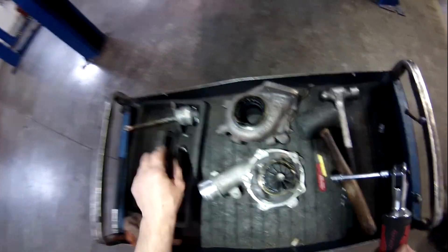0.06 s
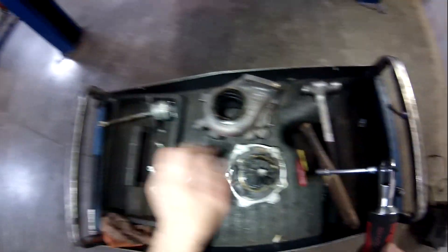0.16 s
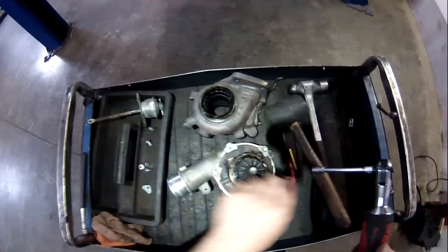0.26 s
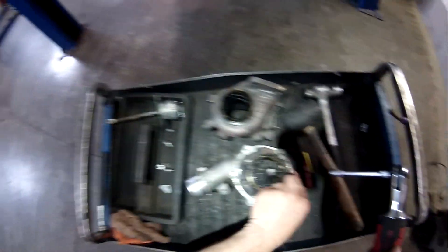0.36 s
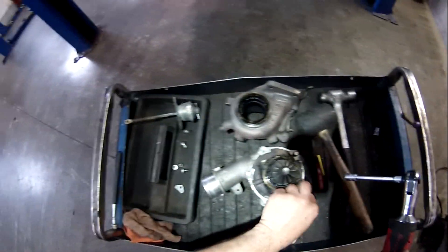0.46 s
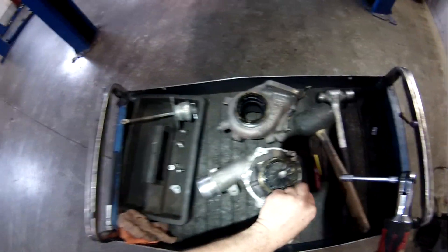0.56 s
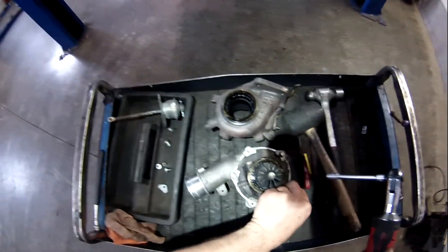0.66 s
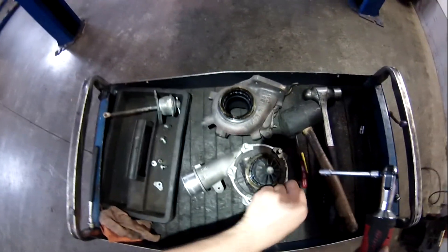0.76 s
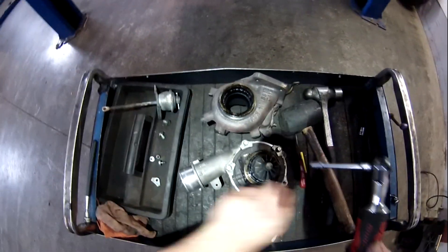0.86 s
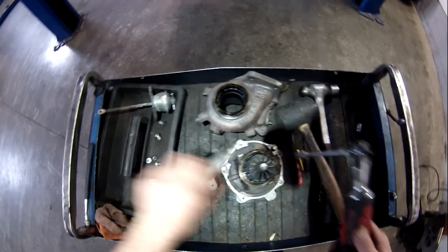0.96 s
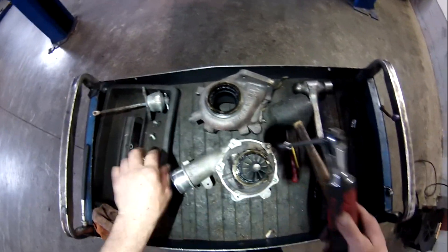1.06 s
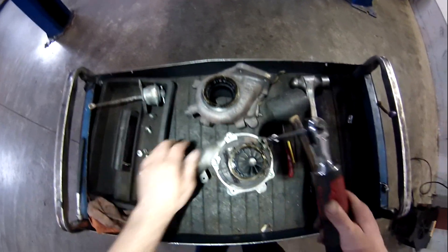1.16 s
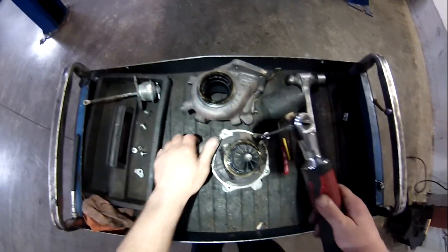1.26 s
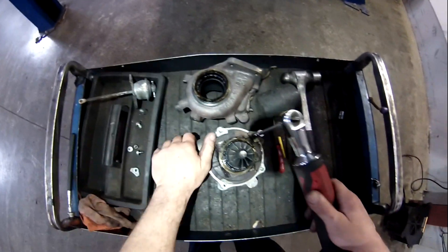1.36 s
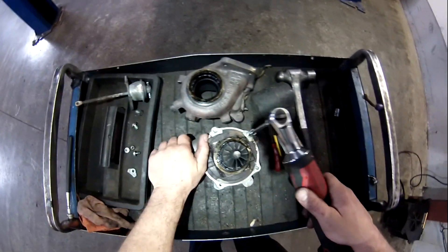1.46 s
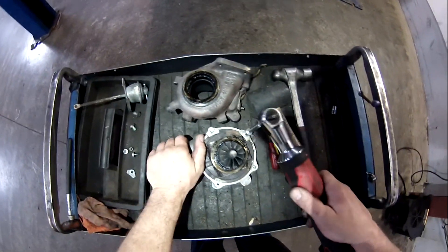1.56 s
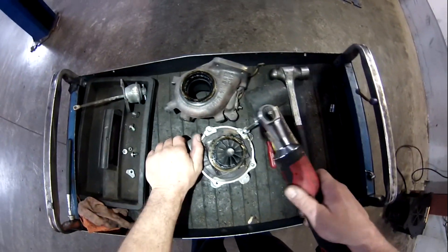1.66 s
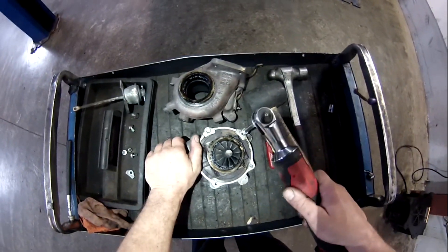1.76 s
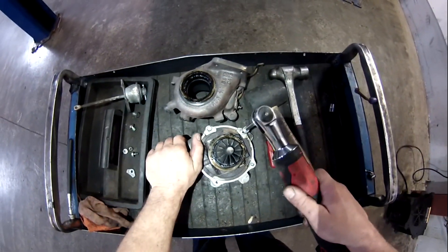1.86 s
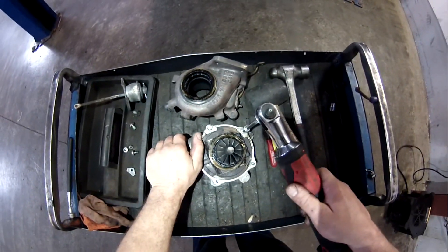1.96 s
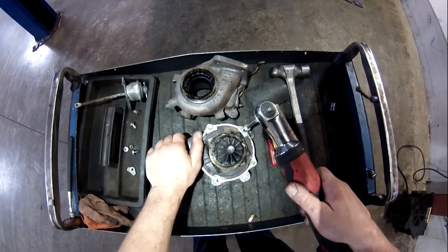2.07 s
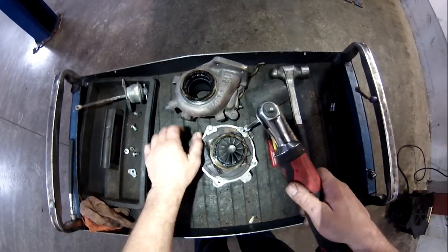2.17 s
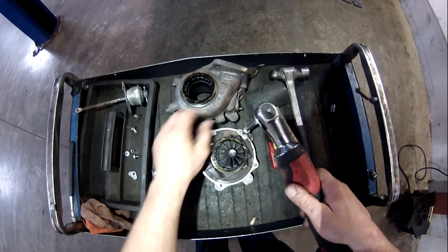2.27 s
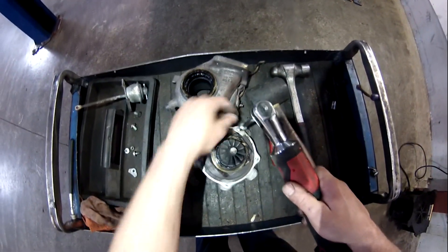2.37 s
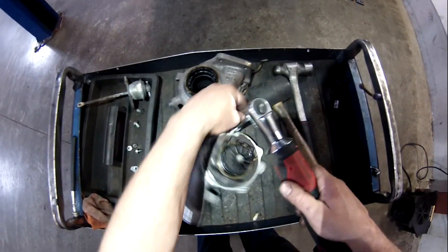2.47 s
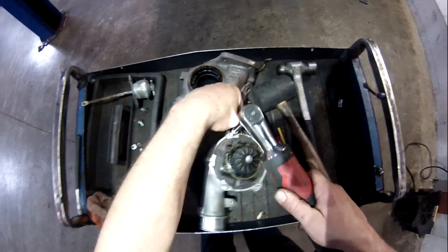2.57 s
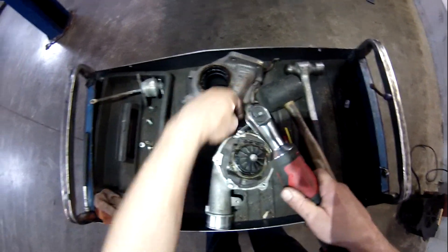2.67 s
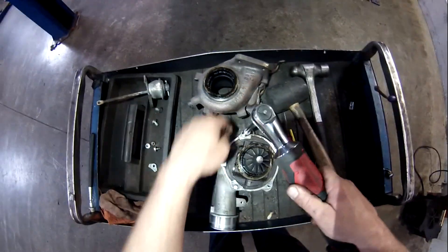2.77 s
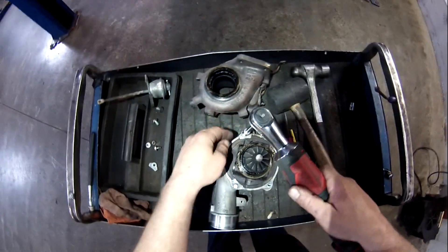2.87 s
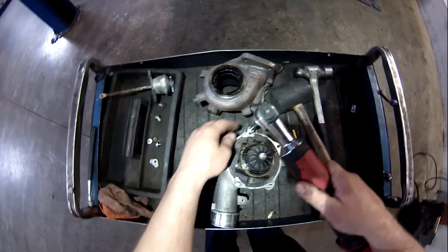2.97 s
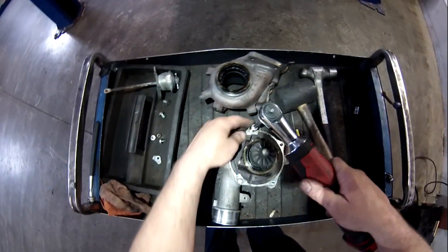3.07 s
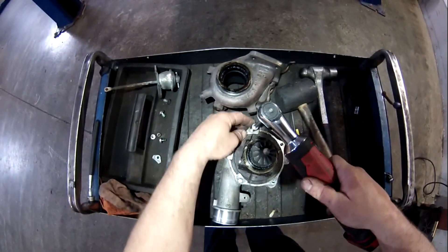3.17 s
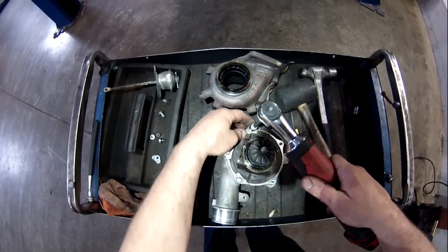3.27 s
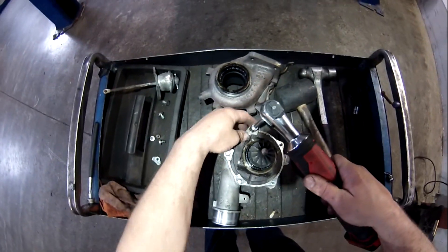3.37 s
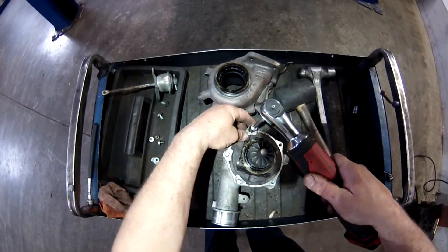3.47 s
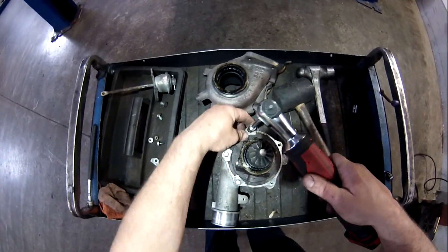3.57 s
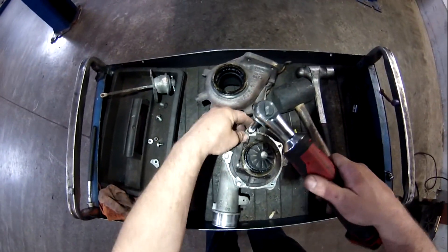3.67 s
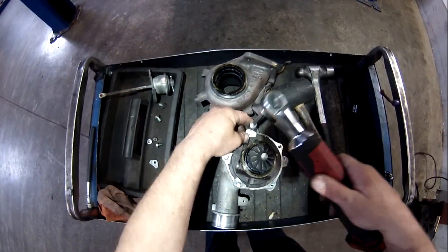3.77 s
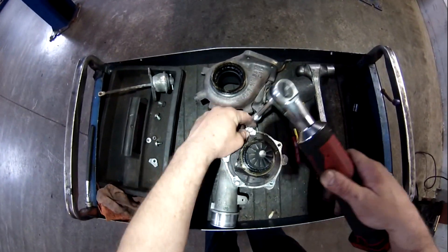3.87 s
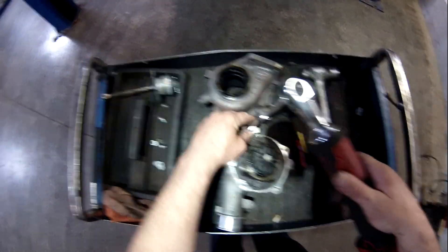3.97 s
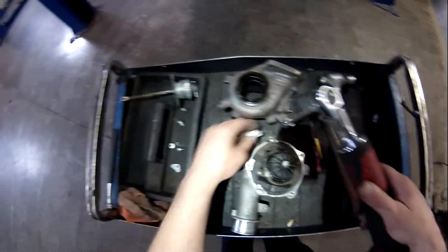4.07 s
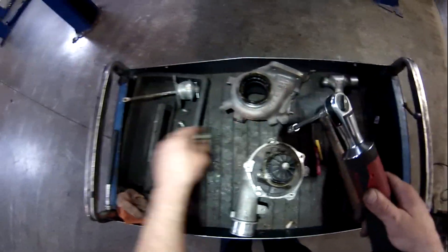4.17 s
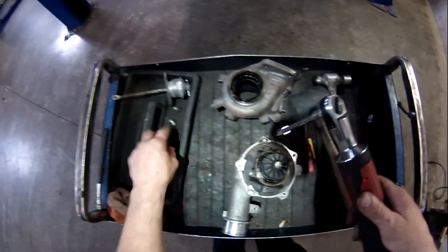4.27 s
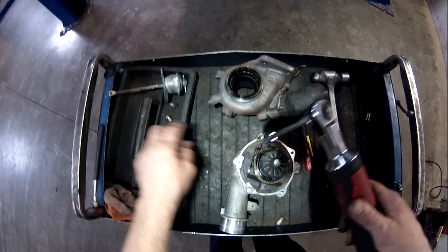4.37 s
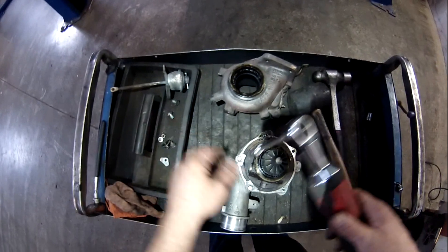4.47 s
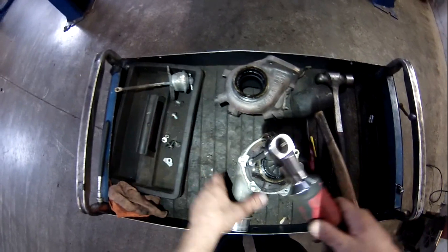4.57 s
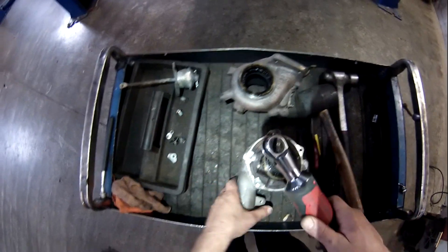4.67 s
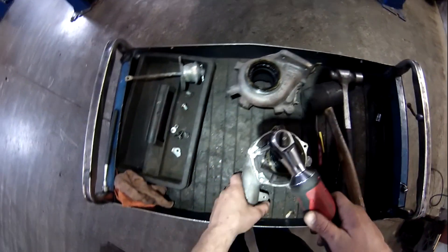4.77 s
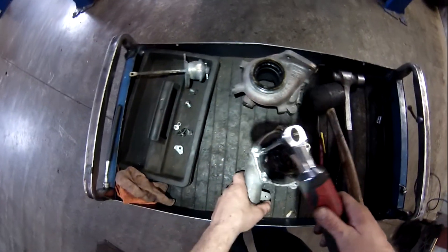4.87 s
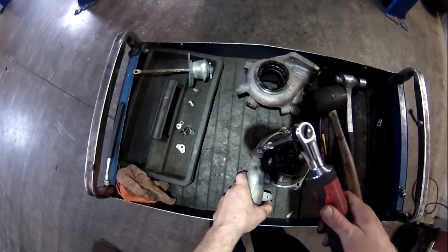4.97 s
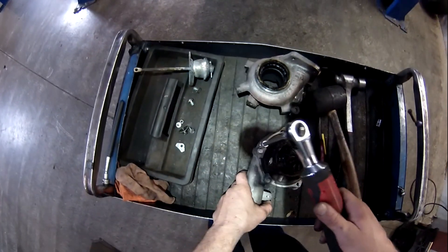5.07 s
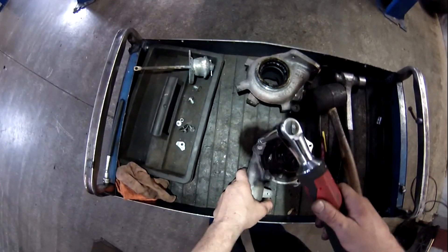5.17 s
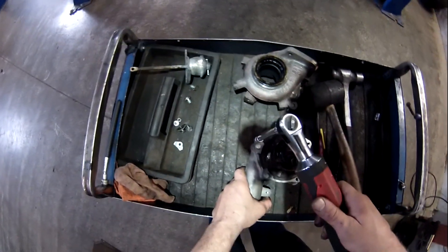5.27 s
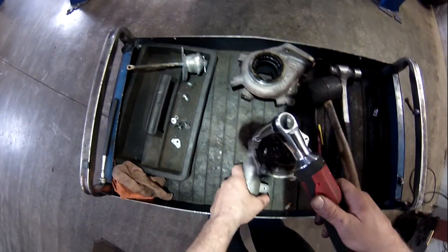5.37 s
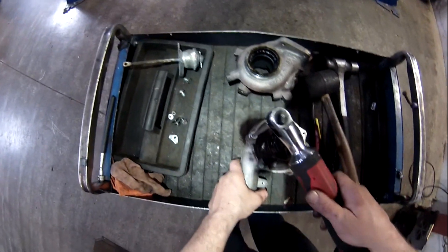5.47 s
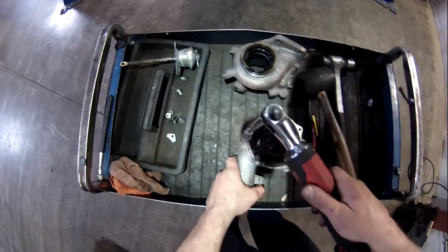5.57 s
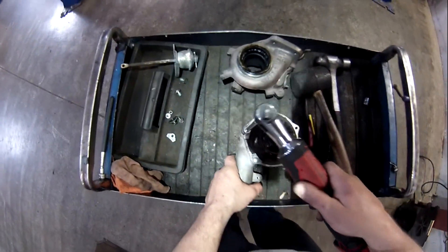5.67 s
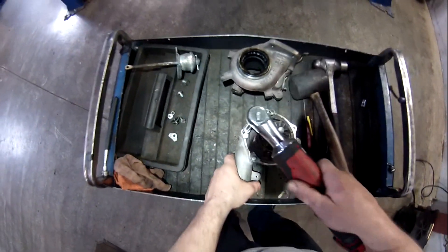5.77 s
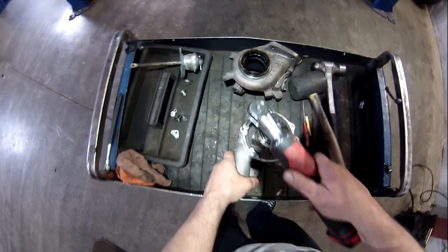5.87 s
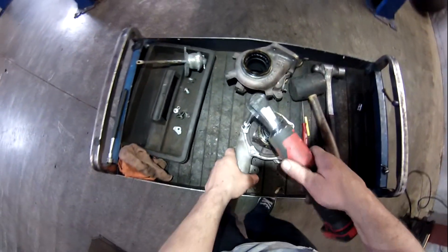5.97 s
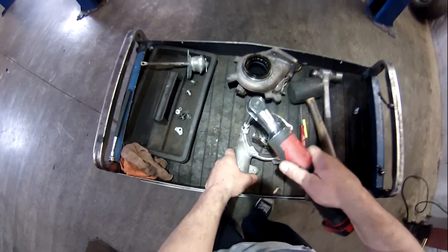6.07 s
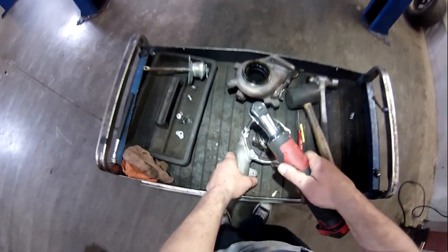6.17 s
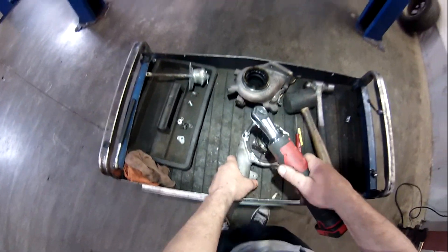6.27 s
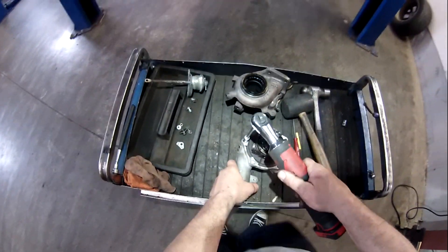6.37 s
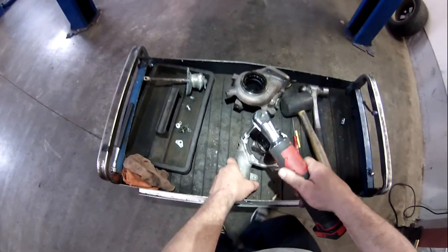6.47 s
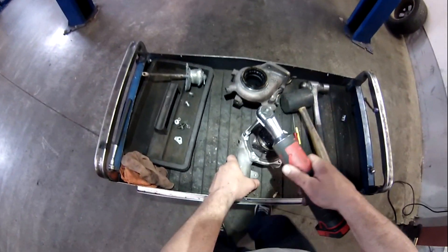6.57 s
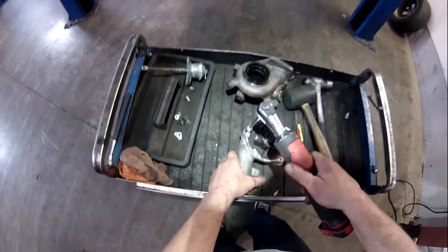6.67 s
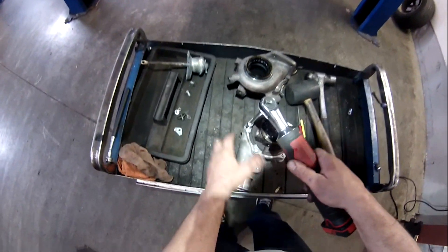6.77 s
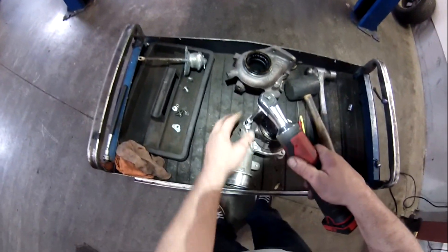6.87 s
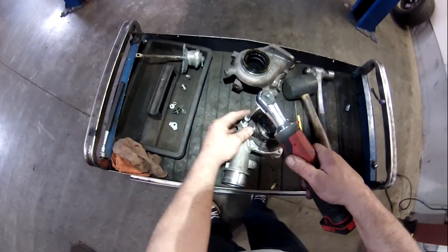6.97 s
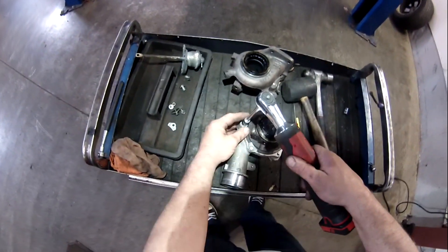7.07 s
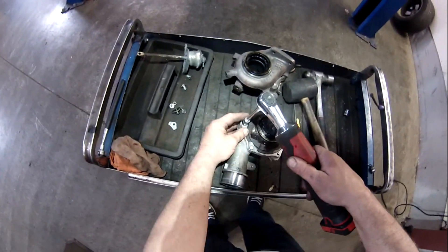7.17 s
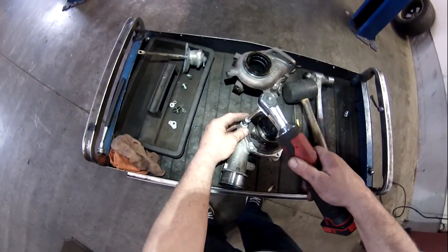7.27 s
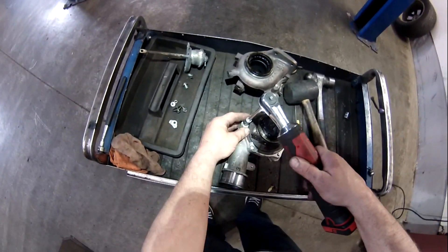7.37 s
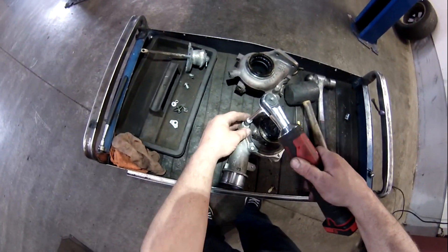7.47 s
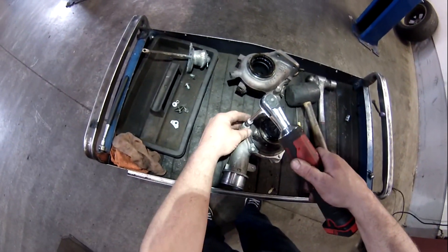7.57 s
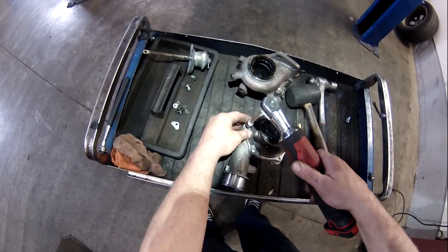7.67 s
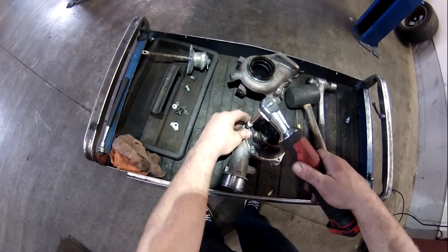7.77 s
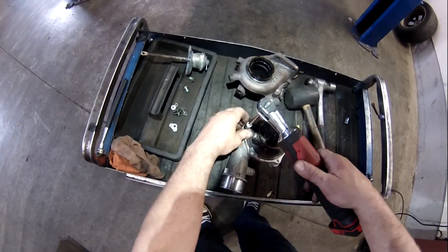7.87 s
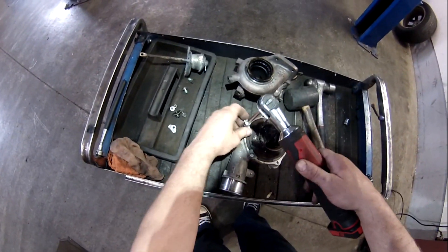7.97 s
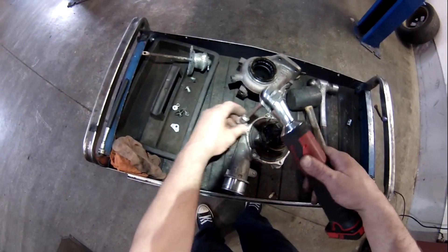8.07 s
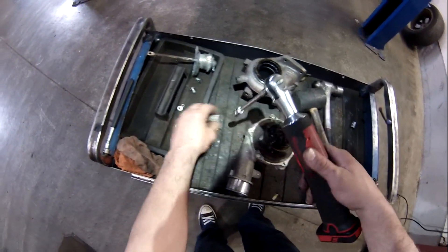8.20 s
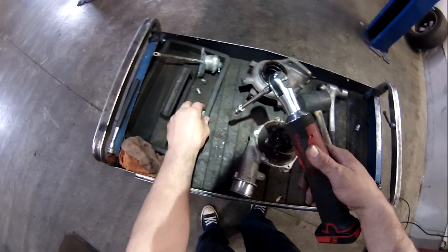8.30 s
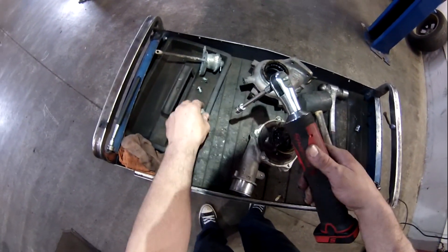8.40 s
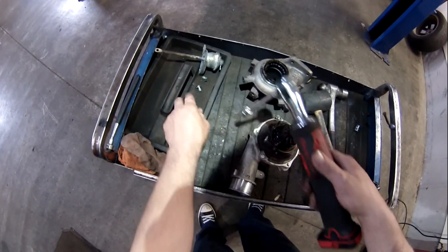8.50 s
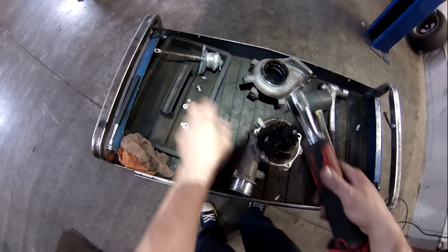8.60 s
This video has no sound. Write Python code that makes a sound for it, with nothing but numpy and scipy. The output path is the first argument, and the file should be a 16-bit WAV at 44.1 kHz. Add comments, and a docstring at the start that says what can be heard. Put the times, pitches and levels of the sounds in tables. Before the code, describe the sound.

In an echoing workshop with steady air noise and faint hum, a bolt smacks into a soft plastic tray and bounces. The housing knocks on the cart, then a cordless ratchet rattles for two seconds, labouring and then running free. More bolts drop, the socket clinks, and a second similar run follows before a faint last drop. A body-worn microphone close by clips on the loudest hits.

```python
"""First a bolt drops and bounces in a plastic tray, over the steady air noise and hum of a workshop.
Then a cordless ratchet spins two bolts out of a turbo housing lying on a plastic cart: on every crank turn
the pawl and yoke clack in the steel head, made of noise bursts, over gear hum made of sine tones.
In between, more bolts drop, the housing knocks on the cart and the socket clinks: noise bursts plus ringing
tones. The room echoes, and a body-worn camera close by overloads on the peaks."""
import sys
import numpy as np
from scipy import signal
from scipy.fft import rfft, irfft
from scipy.io import wavfile
from scipy.ndimage import uniform_filter1d

SR = 44100
rng = np.random.default_rng(int(sys.argv[2]) if len(sys.argv) > 2 else 0)


def bounce(signal):
    """Save signal as a 16-bit WAV file at the path given by the first command-line argument."""
    frames = np.transpose(np.atleast_2d(signal))
    limited = np.clip(frames, -1, 1)
    pcm = np.round(limited * 32767).astype(np.int16)
    wavfile.write(sys.argv[1], SR, pcm)


N = 381024


# trigger pulls: (start [s], trigger eased [s], stop [s], bolt cracks loose [s], spin-up [s],
# slowing after easing [Hz per s], clatter when free [dB], shake when free [dB])
TRIGGER_PULLS = [(1.694, 3.629, 3.735, 1.695, .05, 55, -8, -49.5),
                 (5.972, 7.721, 7.912, 6.089, .075, 114.8, -8.5, -54)]
# how hard the thread grips as the bolt backs out, one curve a pull: (time [s], grip [0-1])
THREAD_GRIP = [
    [(1.7, 0.77), (1.92, .45), (2.35, 0.64), (2.52, .98), (2.95, .8), (3.22, 0.04), (3.6, 0)],
    [(6.1, 0.82), (6.33, 0.98), (6.5, .8), (6.82, 0.79), (6.98, 0.37), (7.35, 0.04), (7.7, 0.07)],
]
# the part of the housing that sings along, one row a pull: (pitch [Hz], width [Hz], level [dB])
HOUSING_NOTES = [(520, 100, -1), (984, 166, -3.5)]


def unscrew_bolts():
    """Each bolt grips in its own way and passes the clatter to another part of the housing."""
    pulls = zip(TRIGGER_PULLS, THREAD_GRIP, HOUSING_NOTES)
    return sum(ratchet(pull, grip, note) for pull, grip, note in pulls)


# contacts within one crank turn: (share of the turn [0-1], level [dB], timing scatter [ms])
CONTACTS = [(.04, -12, .12), (.12, -7, .25), (.2, -10, .3), (.47, -9, .35), (.69, -11, .5), (.82, -16, .5),
            (.94, -9, .4)]


def ratchet(pull, grip_curve, housing_note, wobble=.008, unsteady_db=0.78, spin_up_db=-17, spin_up_s=0.031):
    """One trigger pull: the contacts of each crank turn strike the head while gears hum and the cart shakes."""
    t = np.arange(N) / SR
    start, _, stop, *_ = pull
    running = (t >= start) & (t <= stop)
    rate, clatter_db, shake_db = drive(t, pull, grip_curve)
    hz = (rate * (1 + wobble * walk(30)))[running]
    turns = np.cumsum(hz) / SR
    clacks = np.zeros(N)
    for share, contact_db, scatter_ms in CONTACTS:
        # once in every turn, at the same share of the turn
        times = np.interp(np.arange(share, turns[-1], 1), turns, t[running])
        clacks += undb(contact_db) * contact_train(times, scatter_ms)
    # the motor rustles briefly as it takes up the slack
    rustle_shape = np.interp(t, [start - spin_up_s, start, start + spin_up_s], [0, 1, 0])
    rustle = rustle_shape * rng.standard_normal(N)
    struck = clacks + undb(spin_up_db) * np.std(clacks[running]) * rustle
    clatter = steel_head(struck, housing_note)
    out = clatter / np.std(clatter[running])
    edges = signal.windows.tukey(len(hz), .02)
    add(out, start, edges * gear_tones(turns, hz))
    # the hand never holds the tool quite steady
    out = out * undb(clatter_db + unsteady_db * walk(14))
    add(out, start, edges * cart_shake(turns) * undb(shake_db[running]))
    return out


# crank turns per second when running free, and how many a full grip takes away
FREE_HZ, DRAG_HZ = 87.65, 9.3
KICK_SHARE = .62  # share of its speed at which the motor kicks in
# clatter: growth with speed [dB per octave], growth at full grip [dB], change before the bolt is loose [dB]
SPEED_DB_PER_OCTAVE, GRIP_DB, SLACK_DB = 11.5, 3.5, -4.5
# extra clatter as the bolt cracks loose [dB], and the time constant of its fading [s]
CRACK_DB, CRACK_S = 4.5, .025
# shake: growth at full grip [dB], jolt as the bolt cracks loose [dB], time constant of the jolt [s]
SHAKE_GRIP_DB, JOLT_DB, JOLT_S = 15, 15, 0.15


def drive(t, pull, grip_curve):
    """The motor spins up, the thread drags on it, and it slows as the trigger is eased."""
    start, eased, _, loose, spin_up_s, slowing, db, free_shake_db = pull
    grip = np.interp(t, *np.transpose(grip_curve))
    spun_up = 1 - (1 - KICK_SHARE) * np.exp(-np.maximum(t - start, 0) / spin_up_s)
    hz = (FREE_HZ - DRAG_HZ * grip) * spun_up - slowing * np.maximum(t - eased, 0)
    hz = np.maximum(hz, FREE_HZ / 2)

    def after_crack(decay_s):
        """A jump to 1 as the bolt cracks loose, then an exponential fade."""
        return (t >= loose) * np.exp(-np.maximum(t - loose, 0) / decay_s)

    speed_db = SPEED_DB_PER_OCTAVE * np.log2(hz / FREE_HZ)
    clatter_db = db + speed_db + GRIP_DB * grip
    clatter_db = clatter_db + SLACK_DB * (t < loose) + CRACK_DB * after_crack(CRACK_S)
    shake_db = free_shake_db + speed_db + SHAKE_GRIP_DB * grip + JOLT_DB * after_crack(JOLT_S)
    return hz, clatter_db, shake_db


# a clack dies away by 60 dB in this time [s]; its strength varies a little from turn to turn [dB]
CLACK_T60, CLACK_SCATTER_DB = .008, 1.8


def contact_train(times, scatter_ms, tail_db=-21, tail_t60=0.21, loose_db=-2, drift=0.33):
    """One contact a turn; its ring drifts as the socket turns, and the loose parts never meet twice alike."""
    t = np.arange(SR // 40) / SR
    out = np.zeros(N)
    own_ring = crack(t, CLACK_T60, tail_db, tail_t60)
    for when, (late, strong) in zip(times, rng.standard_normal((len(times), 2))):
        own_ring = np.cos(drift) * own_ring + np.sin(drift) * crack(t, CLACK_T60, tail_db, tail_t60)
        loose_parts = crack(t, CLACK_T60, tail_db, tail_t60)
        clack = unit(own_ring + undb(loose_db) * loose_parts)
        add(out, when + late * scatter_ms / 1000, clack * undb(CLACK_SCATTER_DB * strong))
    return out


# tone of the ratchet head: (pitch [Hz], level [dB])
HEAD_TONE = [(60, -21), (330, -21), (430, -11), (520, -11.5), (700, -9), (980, -8), (1800, -4), (2400, 1.5),
             (3600, 2.5), (4600, 2.5), (5500, 2.5), (7400, -1.5), (9500, -11.5), (15000, -15.5)]
# sharper resonances of the steel head: (pitch [Hz], width [Hz], level [dB])
HEAD_RINGS = [(4490, 380, -8), (7560, 300, -13)]


def steel_head(struck, housing_note):
    """The head colours the clacks, and its resonances and one part of the housing ring along."""
    out = colour(struck, HEAD_TONE)
    rings = [undb(db) * resonate(out, f, f / width) for f, width, db in [*HEAD_RINGS, housing_note]]
    return out + sum(rings)


# resonances of the tool's body: (pitch [Hz], width [Hz], level against the clatter [dB])
BODY = [(399.1, 31, -29), (507.5, 94, -26.5), (682, 95, -31.5), (947.6, 37, -23), (1039, 50, -24.5),
        (1236, 140, -25.5), (1570, 250, -27)]
GEAR_SLACK = .45  # size of the random phase wander [radians]


def gear_tones(turns, hz, flutter_db=4.5, count=20):
    """Multiples of the crank rate swell near the body's resonances; gear slack makes each one flutter."""
    out = 0
    for k in range(4, count):
        power = 0
        for f, width, db in BODY:
            power = power + undb(2 * db) / (1 + (2 * (k * hz - f) / width) ** 2) ** 2
        flutter = undb(flutter_db * walk(22)[:len(hz)])
        phase = 2 * np.pi * k * turns + GEAR_SLACK * walk(45)[:len(hz)]
        out = out + np.sqrt(power) * flutter * np.sin(phase)
    return np.sqrt(2) * out


def cart_shake(turns, rumble_db=-4, rumble_hz=170):
    """The crank shakes the cart through the housing: a low tone at the crank rate plus low rumble."""
    rumble = band_noise(45, rumble_hz, len(turns))
    return np.sqrt(2) * np.sin(2 * np.pi * turns) + undb(rumble_db) * unit(rumble)


# bolts landing and bouncing: (time [s], level [dB], brightness [dB per octave], favoured note [Hz])
BOLT_DROPS = [(.1595, -3, 0, 2470), (.263, -18.5, -2, 1700), (.294, -27.5, -3, 1100),
              (.401, -37.5, -2, 1800), (.4365, -22, -1, 2500), (4.3969, -8, 1, 3400),
              (4.404, -13, -1.5, 3330), (4.4102, -6, -0.5, 2370), (4.468, -34.5, -7, 800),
              (4.534, -23.5, -1, 2200), (4.558, -35, -5, 1600), (8.397, -38, -1.5, 1500),
              (8.434, -25, -4, 1540)]
# tone of the tray: (pitch [Hz], level [dB])
TRAY_TONE = [(100, -27.5), (400, -12.5), (600, -4.5), (730, 7), (1000, -5.5), (1500, 2), (1950, -3),
             (2350, 3), (2750, -8.5), (3350, -2), (5000, -8.5), (8000, -12), (9600, -7), (15000, -12)]
# the tray is soft plastic and hardly rings: (pitch [Hz], level [dB], time to fall 60 dB [s])
TRAY_MODES = [(727, 0, .04), (1448, -9, .035), (2300, -13, .03), (3203, -13, .035)]


def bolt_drops():
    """Bolts hit the soft tray: dull bursts with hardly any ring."""
    out = np.zeros(N)
    for s, *strike in BOLT_DROPS:
        hit = blow(TRAY_TONE, TRAY_MODES, *strike, ring_db=-20.5, t60=0.024, tail_db=-19.5, tail_t60=0.14)
        add(out, s, hit)
    return out


# housing on cart: (time [s], level [dB], brightness [dB per octave], favoured note [Hz])
KNOCKS = [(1.2046, 0.5, -0.5, 1063), (1.2944, -10.5, 0, 1500), (1.322, -27.5, -1, 800),
          (1.336, -19, -6.5, 698), (1.3596, -17.5, -2.5, 2540), (1.513, -24, -5.5, 758),
          (2.6563, -3, -0.5, 1306), (5.153, -32.5, -5.5, 648), (6.091, -17, -6, 600),
          (6.135, -21, -4.5, 99), (6.21, -19.5, -9, 499), (6.651, -24, -6, 397), (7.41, -33, -12, 250)]
# tone of the cart: (pitch [Hz], level [dB])
CART_TONE = [(50, -14.5), (130, -4.5), (300, -6.5), (620, 3), (820, -0.5), (1020, -2), (1350, -4.5),
             (1700, -1.5), (2600, -4), (4200, -9.5), (6000, -18.5), (9000, -13), (15000, -12.5)]
# ringing notes of the cart: (pitch [Hz], level [dB], time to fall 60 dB [s])
CART_MODES = [(286, -8, 0.082), (410, -14, 0.34), (641, -5, 0.16), (1017, 3.5, 0.087), (1670, -13.5, .06)]


def housing_knocks():
    """The housing knocks and rocks on the cart, which answers with a burst and a short ring."""
    out = np.zeros(N)
    for s, *strike in KNOCKS + rocking():
        hit = blow(CART_TONE, CART_MODES, *strike, ring_db=-13.5, t60=0.027, tail_db=-19.5, tail_t60=0.2)
        add(out, s, hit)
    return out


# first thump [s], its level [dB], gap between thumps [s], loss a thump [dB]
ROCK_START_S, ROCK_DB, ROCK_GAP_S, ROCK_LOSS_DB = 2.667, -8.5, .011, 2.4
# brightness [dB per octave], favoured note of each side in turn [Hz]
ROCK_TILT_DB, ROCK_NOTES_HZ = -7.5, (281, 110)


def rocking(count=6):
    """The swung housing rocks to rest in quick, dull thumps, each weaker than the last; rows as in KNOCKS."""
    rows = []
    for k in range(count):
        when, db = ROCK_START_S + k * ROCK_GAP_S, ROCK_DB - k * ROCK_LOSS_DB
        rows.append((when, db, ROCK_TILT_DB, ROCK_NOTES_HZ[k % 2]))
    return rows


# socket on bolt heads: (time [s], level [dB], brightness [dB per octave], favoured note [Hz],
# ring against the burst [dB])
CLINKS = [(1.429, -29.5, -4, 2290, -26), (1.527, -37, 1.5, 4590, -5.5), (4.77, -24.5, -2, 2220, 2.5),
          (4.798, -28.5, -3, 4000, -2), (4.819, -36, -3, 4660, -20), (5.024, -37.5, -4, 4830, -22),
          (5.1423, -24.5, -1.5, 3450, -22), (5.174, -32, -6, 3500, -27.5), (5.2677, -44, -2.5, 4530, -24),
          (5.344, -37.5, -2, 3500, -15), (5.54, -35.5, -3.5, 1994, -25.5), (5.555, -39, -4, 2000, -27),
          (5.873, -30.5, -3, 1966, -24), (8.216, -33, -2.5, 1913, -18), (8.3687, -37.5, -3.5, 1587, -24)]
# tone of the socket: (pitch [Hz], level [dB])
SOCKET_TONE = [(150, -23), (600, -5.5), (1300, -6), (2200, -3), (2800, -5), (3500, -1.5), (5000, 1),
               (8000, -2.5), (11000, -8), (15000, -10.5)]
# ringing notes of the socket: (pitch [Hz], level [dB], time to fall 60 dB [s])
SOCKET_MODES = [(3400, -3.5, 0.08), (4700, -16, .08), (5420, 0, 0.075), (6519, -4, 0.083), (6500, -7, .06),
                (7200, -19, .1), (8550, -18.5, 0.13)]


def socket_clinks():
    """The socket taps the bolt heads: bright bursts, some with a clear ring."""
    out = np.zeros(N)
    for s, *strike in CLINKS:
        add(out, s, blow(SOCKET_TONE, SOCKET_MODES, *strike, t60=0.028, tail_db=-13.5, tail_t60=0.098))
    return out


def blow(spectrum, modes, db, tilt_db, note_hz, ring_db, t60, tail_db, tail_t60, note_db=2, note_q=3.3):
    """One impact: a coloured burst, db loud in its first 4 ms, plus the ringing notes of the struck thing."""
    t = np.arange(SR // 3) / SR
    first = slice(SR // 250)
    burst = colour(even_out(crack(t, t60, tail_db, tail_t60)), spectrum, tilt_db)
    # the spot that is struck favours one group of notes
    burst = burst + undb(note_db) * resonate(burst, note_hz, note_q)
    ring = np.zeros(len(t))
    for hz, mode_db, ring_t60 in modes:
        gain = undb(mode_db + 2 * rng.standard_normal())  # never struck twice alike
        ring += gain * np.sin(2 * np.pi * hz * t) * fade(t, ring_t60)
    return undb(db) * (burst / np.std(burst[first]) + undb(ring_db) * ring / np.std(ring[first]))


# strokes of the hand, each swelling and fading: (loudest [s], length [s], level [dB])
BRUSH_STROKES = [(8.378, .1, -45), (8.447, 0.074, -44)]


def brush(low_hz=900, high_hz=2100, grain_db=3):
    """A hand rubs softly over the plastic tray: a band of noise with a quick, random grain."""
    rub = band_noise(low_hz, high_hz, N)
    strokes = np.zeros(N)
    for s, length, db in BRUSH_STROKES:
        add(strokes, s - length / 2, undb(db) * signal.windows.hann(int(length * SR)))
    return unit(rub * undb(grain_db * walk(200))) * strokes


# reverberation of the shop: (pitch [Hz], time to fall 60 dB [s])
SHOP_T60 = [(200, 1.6), (1000, 0.64), (4000, 1.01), (8000, 1.01), (15000, 0.96)]


def shop(x, wet_db=-19, build_s=0.0067):
    """The large room answers with a weak tail of noise; its low notes last longest."""
    t = np.arange(SR) / SR
    hz, frames, cells = signal.stft(rng.standard_normal(SR), SR, nperseg=256)
    faded = cells * fade(frames, on_log_axis(SHOP_T60, hz)[:, None])
    tail = signal.istft(faded, SR)[1][:SR]
    tail = tail * (1 - np.exp(-t / build_s))
    return undb(wet_db) * signal.fftconvolve(x, tail / np.linalg.norm(tail))[:N]


# tone of the moving air: (pitch [Hz], level [dB])
AIR_TONE = [(25, -15), (60, -11.5), (110, -10.5), (145, -20), (242, -21.5), (450, -26), (1000, -29),
            (2000, -34), (4800, -42), (6050, -53), (7400, -45), (12000, -49.5), (15000, -51.5)]
# fan and mains tones, before the common hum_db: (pitch [Hz], level [dB])
HUM_TONES = [(107.7, -57), (242.2, -60.5), (360.7, -63), (597.5, -61.5), (651.4, -69), (1200, -67.5)]


def ventilation(air_db=-48.5, hum_db=-3, waver_db=2):
    """Nearly steady air noise with fan and mains tones that waver in level and phase."""
    t = np.arange(N) / SR
    air = unit(colour(rng.standard_normal(N), AIR_TONE)) * undb(air_db + 0.53 * walk(6.8))
    hum = np.zeros(N)
    for hz, db in HUM_TONES:
        level = undb(db + waver_db * walk(3.1))
        hum += level * np.sqrt(2) * np.sin(2 * np.pi * hz * t + 0.97 * walk(11))
    return air + undb(hum_db) * hum


# the port has two deep notches: (pitch [Hz], level [dB])
PORT_TONE = [(4800, -1.5), (5500, -6), (6050, -13), (6700, -3), (7400, 0), (9500, 0.5), (10800, -11),
             (12000, -31.5), (13500, -6), (15000, 3.5)]


def microphone_port(x):
    """The small opening of the camera's microphone colours the sound."""
    return colour(x, PORT_TONE)


def undb(db):
    """Turn decibels into gain."""
    return 10 ** (np.asarray(db) / 20)


def unit(x):
    """Scale to an rms of 1."""
    return x / np.sqrt(np.mean(x ** 2) + 1e-18)


def on_log_axis(points, hz):
    """Read (pitch [Hz], value) points on a log-frequency axis."""
    f, value = np.transpose(points)
    return np.interp(np.log(np.maximum(hz, 1)), np.log(f), value)


def colour(x, points, tilt_db=0, size=4096):
    """Causal filter with the given tone, tilted about 1 kHz in dB per octave; the tilt stops at 250 Hz."""
    hz = np.arange(size // 2 + 1) * SR / size
    db = on_log_axis(points, hz) + tilt_db * np.log2(np.maximum(hz, 250) / 1000)
    # folding the cepstrum forward gives minimum phase: the filter answers at once
    cepstrum = irfft(np.log(undb(db)))
    cepstrum[1:size // 2] *= 2
    cepstrum[size // 2 + 1:] = 0
    return signal.fftconvolve(x, irfft(np.exp(rfft(cepstrum))))[:len(x)]


def resonate(x, hz, q):
    """Band-pass with gain 1 at the centre."""
    return signal.lfilter(*signal.iirpeak(hz, q, fs=SR), x)


def band_noise(low_hz, high_hz, length):
    """Random noise limited to a band."""
    band = signal.butter(2, [low_hz, high_hz], "band", fs=SR, output="sos")
    return signal.sosfilt(band, rng.standard_normal(length))


def even_out(x, size=340):
    """Flatten the broad bumps of a burst's spectrum and keep its fine ripple."""
    bins = rfft(x, 2 * len(x))
    broad_power = uniform_filter1d(np.abs(bins) ** 2, size)
    return irfft(bins / np.sqrt(broad_power))[:len(x)]


def crack(t, t60, tail_db, tail_t60):
    """Many close notes struck at once, as noise: a hard, short burst and a weaker tail."""
    return rng.standard_normal(len(t)) * (fade(t, t60) + undb(tail_db) * fade(t, tail_t60))


def fade(t, t60):
    """Exponential decay, 60 dB down after t60."""
    return np.exp(-np.log(1000) * t / t60)


def walk(rate):
    """A slow random wander: straight lines between rate random points a second."""
    knots = rng.standard_normal(int(N / SR * rate) + 2)
    return np.interp(np.arange(N) / SR * rate, np.arange(len(knots)), knots)


def add(out, s, sound):
    """Mix a sound in at time s."""
    i = max(int(s * SR), 0)
    out[i:i + len(sound)] += sound[:max(N - i, 0)]


def scene():
    """Tool and parts in the room, heard through the microphone port, over the ventilation."""
    near = unscrew_bolts() + bolt_drops() + housing_knocks() + socket_clinks() + brush()
    return (microphone_port(near + shop(near)) + ventilation())[None]


def record(dry, ceiling=0.97, top_hz=15350):
    """The camera clips the highest peaks and cuts the top of the treble."""
    low_pass = signal.ellip(8, .2, 70, top_hz, fs=SR, output="sos")
    return signal.sosfilt(low_pass, np.clip(dry, -ceiling, ceiling))


dry = scene()
out = record(dry)
bounce(out)
```